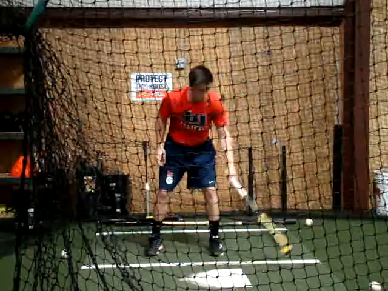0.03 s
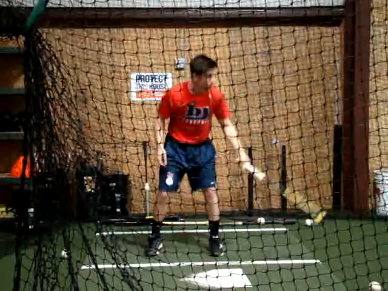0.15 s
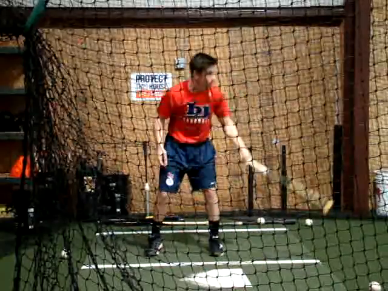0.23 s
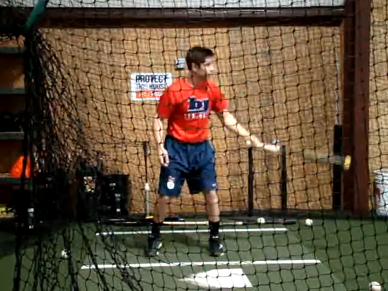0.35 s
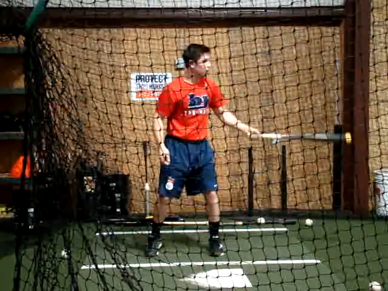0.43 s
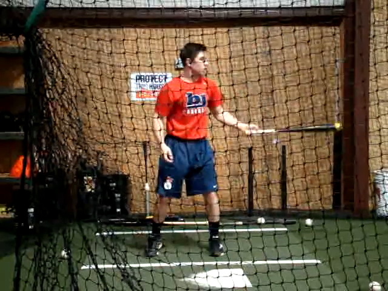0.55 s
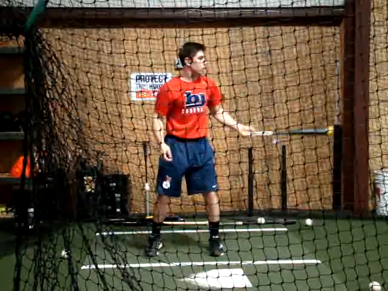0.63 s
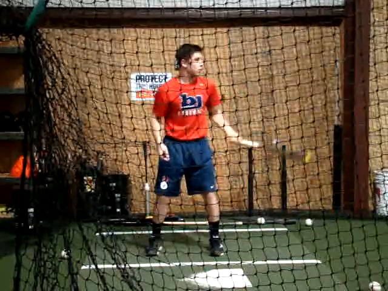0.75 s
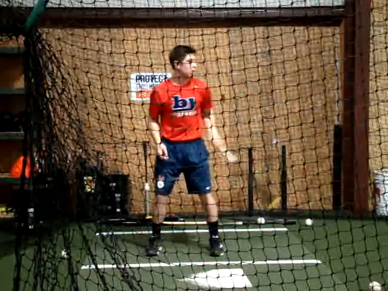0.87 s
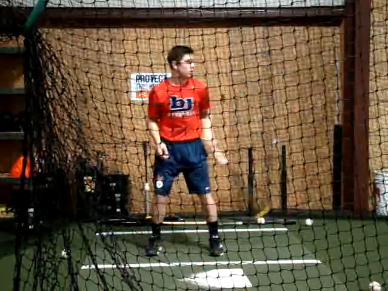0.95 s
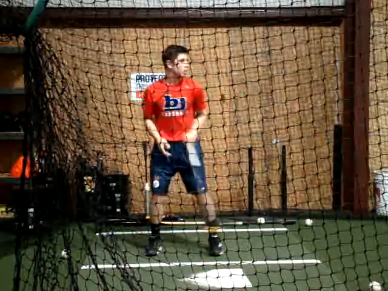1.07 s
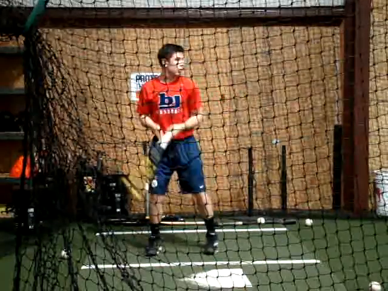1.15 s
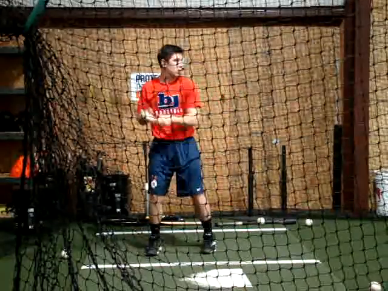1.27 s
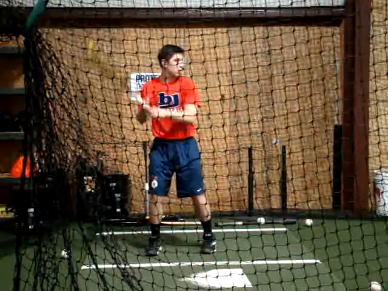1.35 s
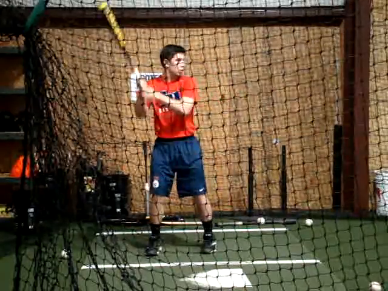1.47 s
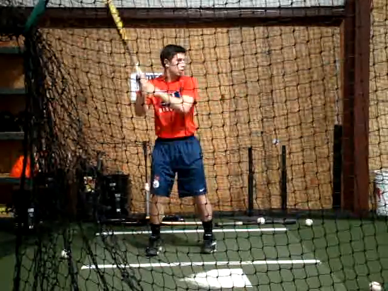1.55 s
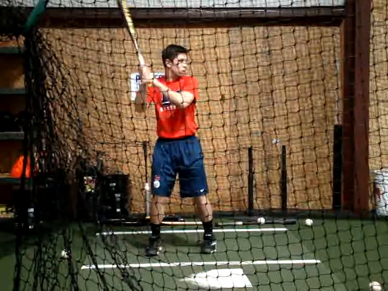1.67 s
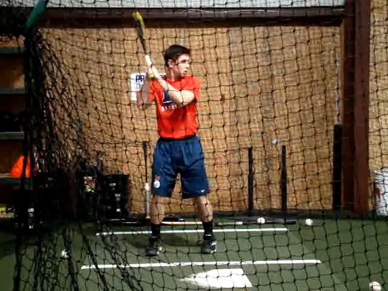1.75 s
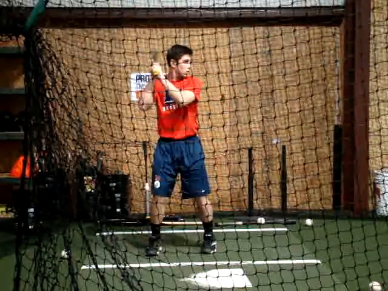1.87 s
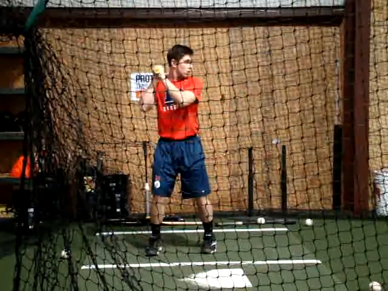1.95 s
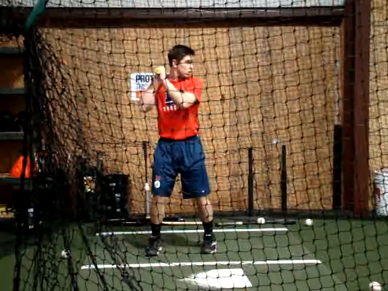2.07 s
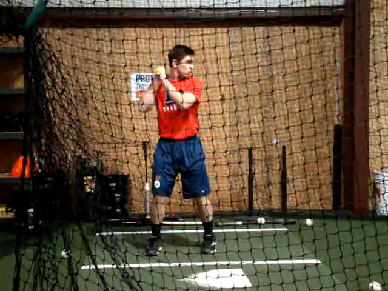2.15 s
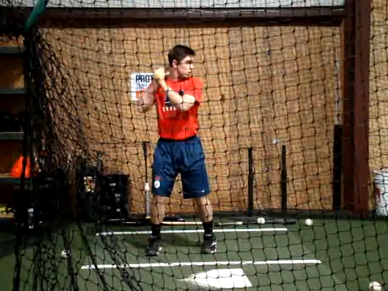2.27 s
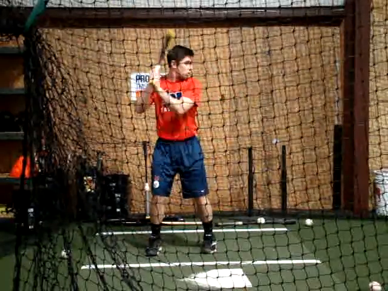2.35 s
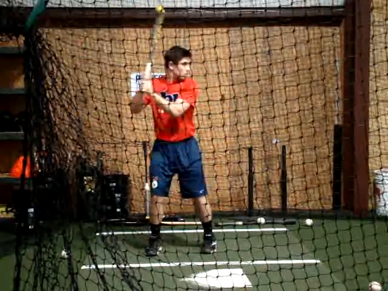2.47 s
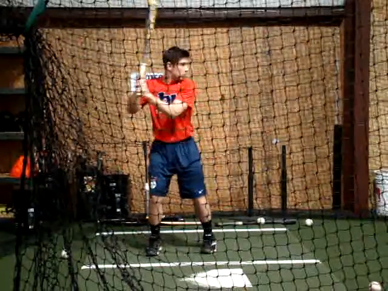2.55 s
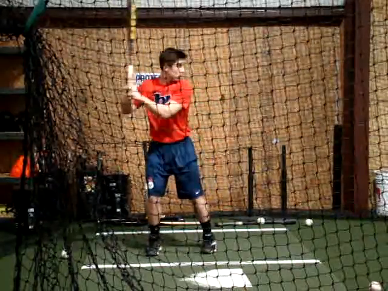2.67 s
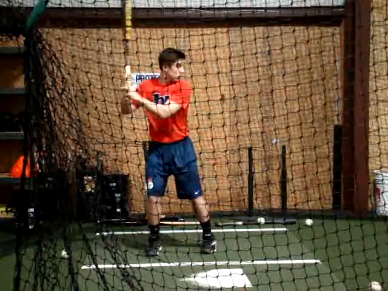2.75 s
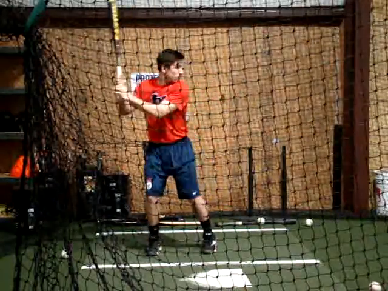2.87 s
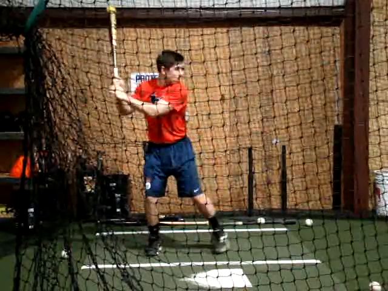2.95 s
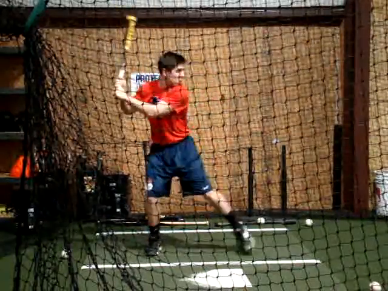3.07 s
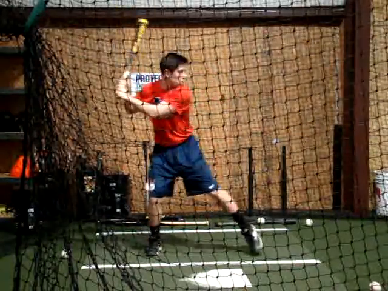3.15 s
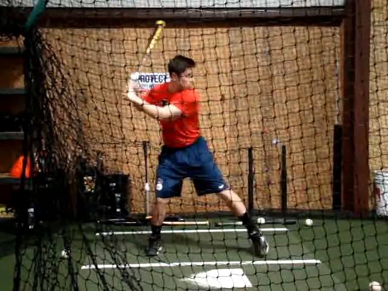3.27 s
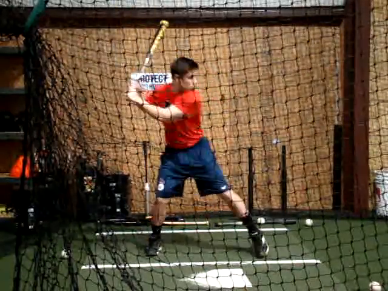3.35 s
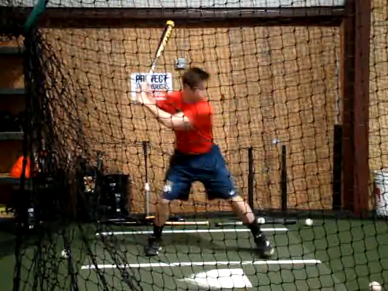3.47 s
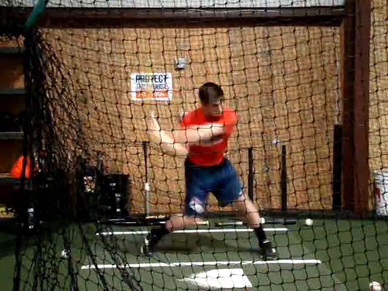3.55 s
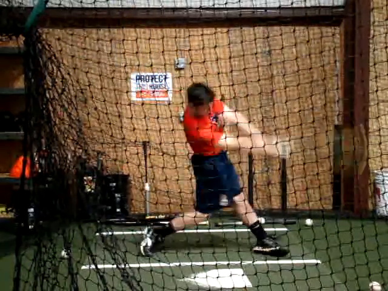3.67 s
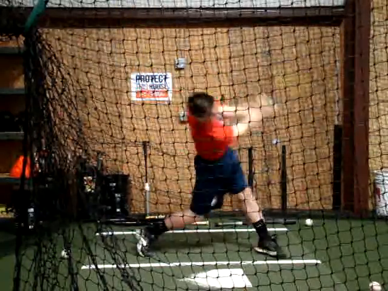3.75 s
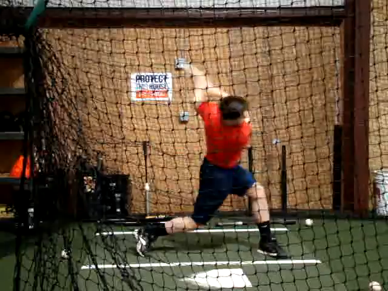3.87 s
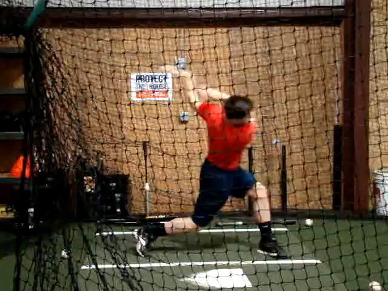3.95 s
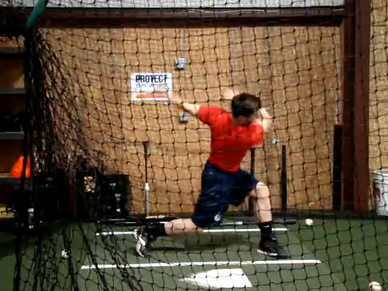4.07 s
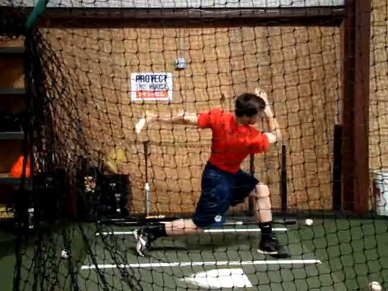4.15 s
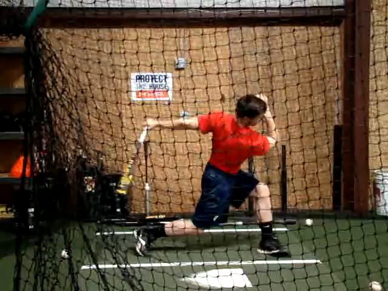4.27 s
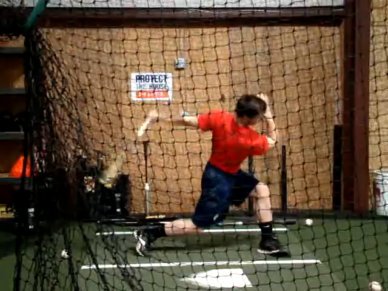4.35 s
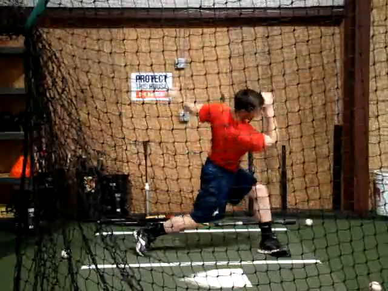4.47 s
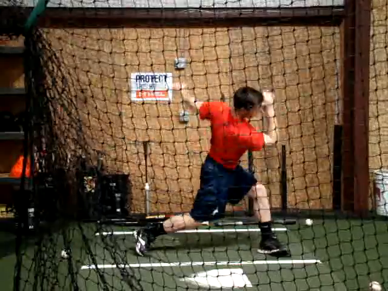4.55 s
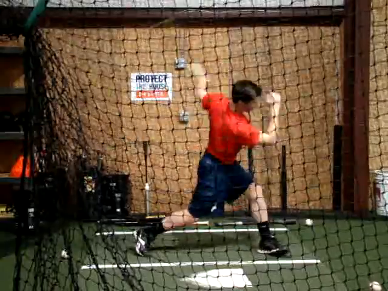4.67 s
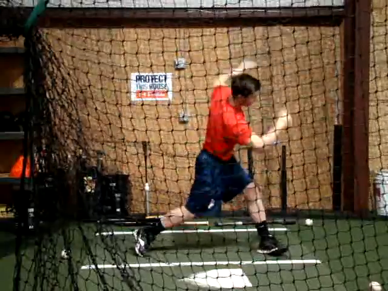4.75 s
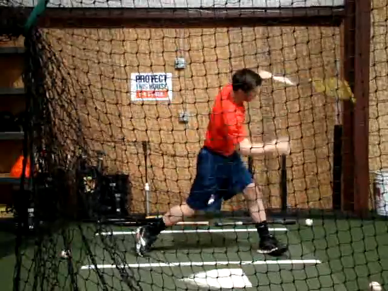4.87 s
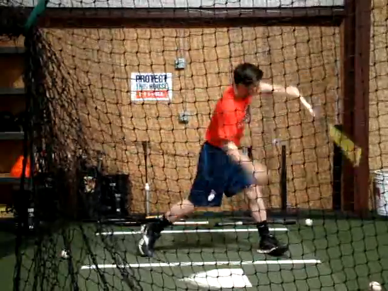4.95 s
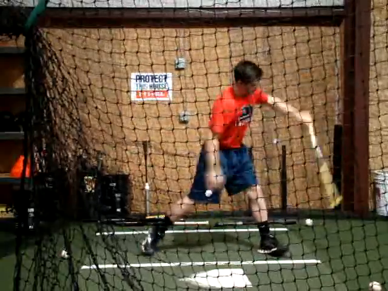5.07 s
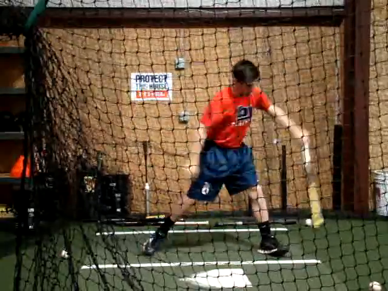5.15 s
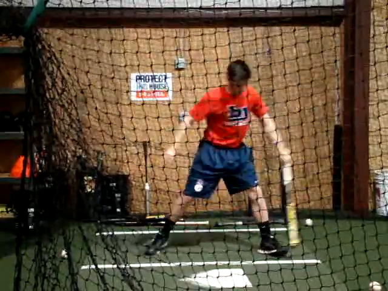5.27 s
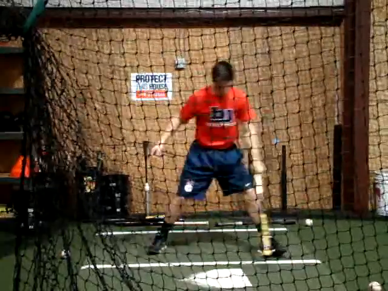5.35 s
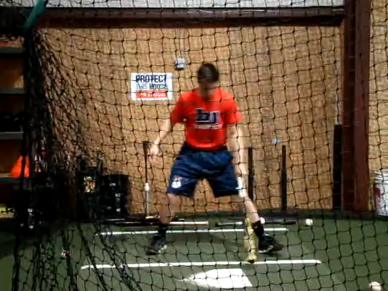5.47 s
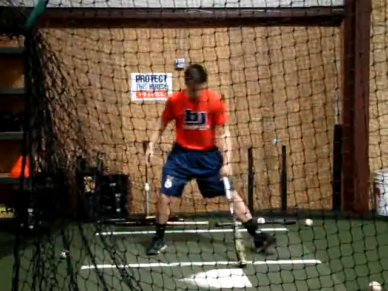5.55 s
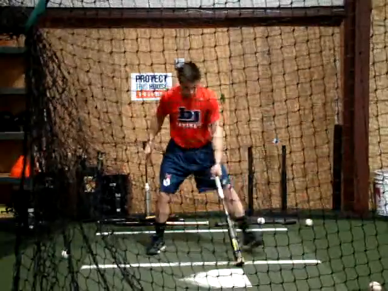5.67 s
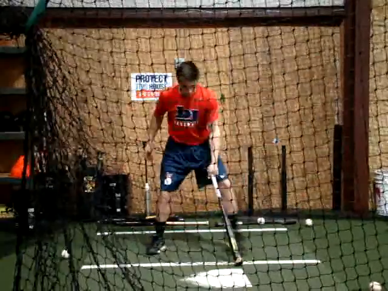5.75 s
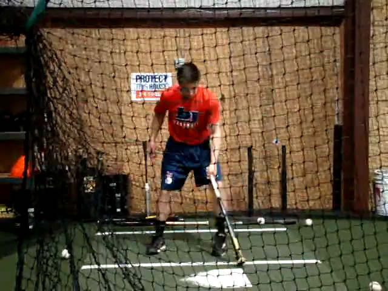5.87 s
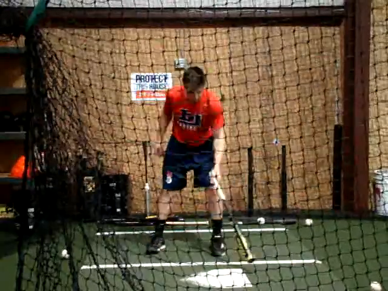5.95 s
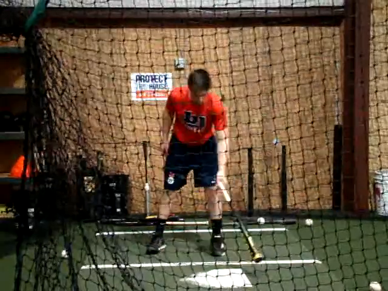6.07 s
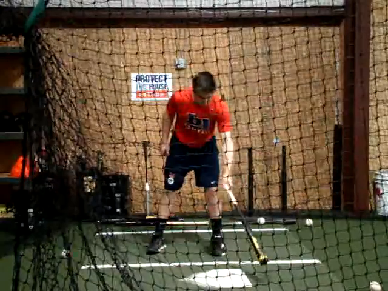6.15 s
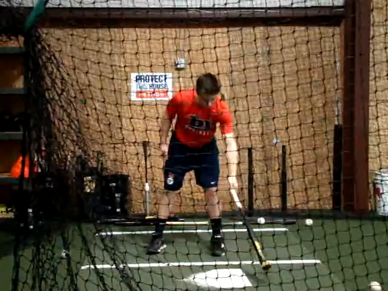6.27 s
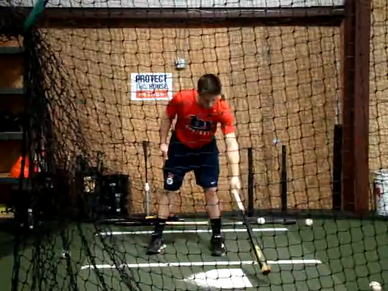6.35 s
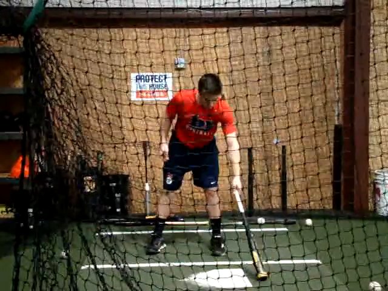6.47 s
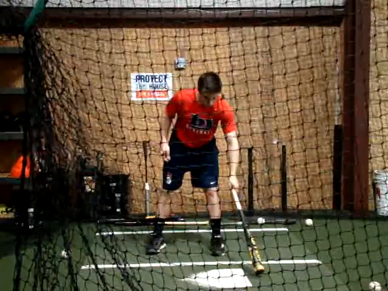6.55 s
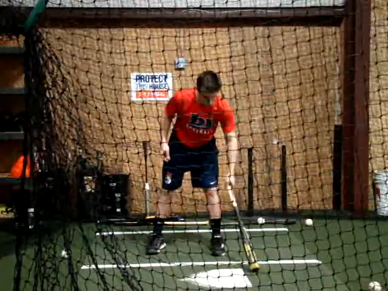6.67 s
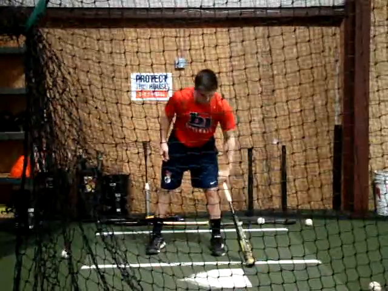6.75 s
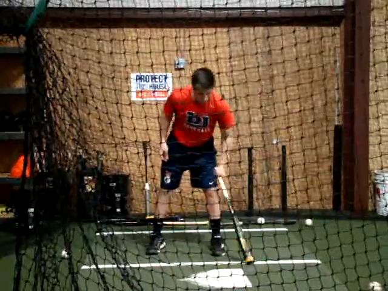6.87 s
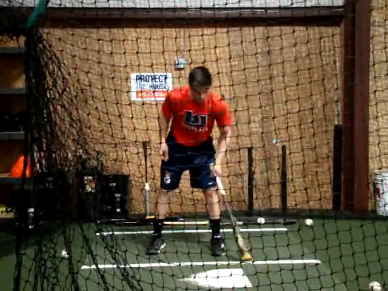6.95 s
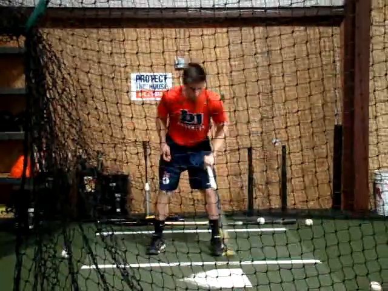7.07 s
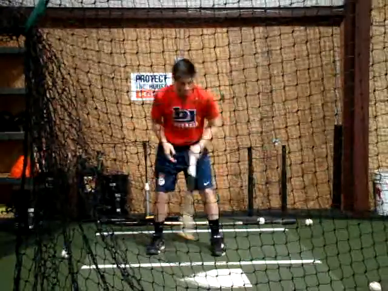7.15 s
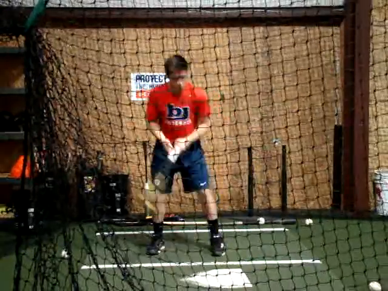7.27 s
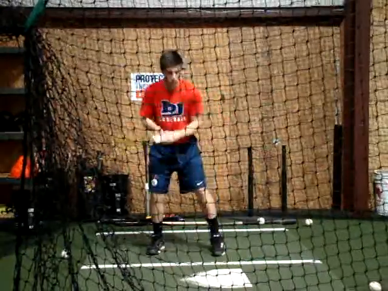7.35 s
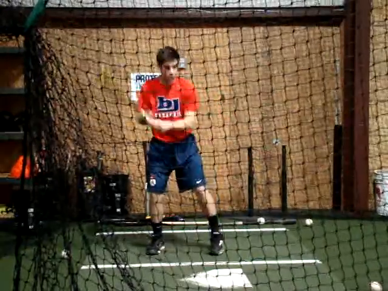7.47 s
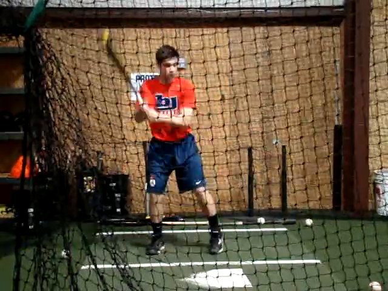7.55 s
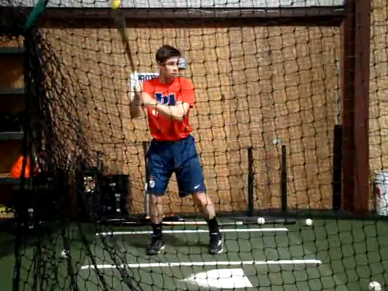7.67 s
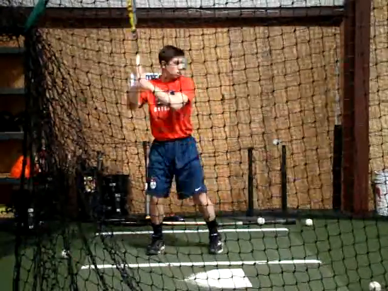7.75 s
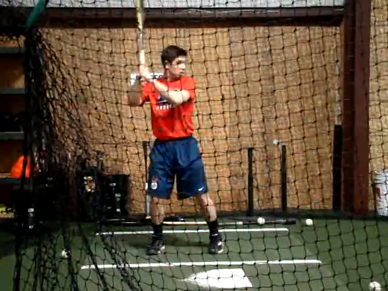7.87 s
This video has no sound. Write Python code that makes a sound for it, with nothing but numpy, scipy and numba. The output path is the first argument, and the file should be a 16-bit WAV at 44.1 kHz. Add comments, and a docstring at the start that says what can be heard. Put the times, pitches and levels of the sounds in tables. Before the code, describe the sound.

A metal bat strikes a baseball once, a sharp crack with a bright ring that dies away within a second in an indoor batting cage. A short foot skid and a rush of air lead into the hit. Afterwards come faint shoe scuffs on turf and a soft knock of the bat's tip. Underneath are a low wavering machine hum, light lamp buzz and vent hiss, which the microphone briefly turns down after the impact.

```python
"""In a netted indoor batting cage, a metal bat hits a baseball with a sharp crack.
The bat rings while it is still swinging, so each wall gets a different pitch (the Doppler effect)
and the hall holds a band of tones around 3 kHz. Air rushes round the bat; there are short shoe scuffs
and longer stretches of faint rustle. Vents hiss, lamps buzz and a far machine slowly runs down.
The camera's automatic gain drops at the hit and creeps back."""
import sys
import numpy as np
from scipy import signal
from scipy.fft import rfft, irfft, next_fast_len
from scipy.io import wavfile
from scipy.ndimage import uniform_filter1d, map_coordinates
from numba import njit

SR = 44100
rng = np.random.default_rng(int(sys.argv[2]) if len(sys.argv) > 2 else 0)


def unload_wav(signal):
    """Save mono or channel-first audio to the path in sys.argv[1] as 16-bit WAV at rate SR, clipped to [-1, 1]."""
    wavfile.write(
        sys.argv[1],
        SR,
        np.round(np.clip(np.atleast_2d(signal).T, -1, 1) * 32767).astype(np.int16),
    )


N = 349272
T = np.arange(N) / SR
HIT_S = 3.7332

# first echoes off floor, walls and roof: delay/s, ring/dB, snap/dB, angle from the bat's path/turns
ECHOES = [(.0049, 3, 1.5, 0.337), (0.0116, 11, -4, 0.4), (0.0194, -39, -4, 0.31), (0.0331, 15.5, -14, .22),
          (.0425, 0.5, -8, .2), (0.0544, -17, 1, .05)]


def amp(db):
    """Turn decibels into a multiplier."""
    return 10 ** (np.asarray(db) / 20)


def unit(x):
    """Scale a signal to an average power of 1."""
    return x / np.sqrt(np.mean(x ** 2) + 1e-20)


def along(points, hz):
    """Read between (frequency, value) points, with octaves evenly spaced."""
    freqs, values = np.transpose(points)
    return np.interp(np.log(hz + 1), np.log(freqs + 1), values)


def filtered(x, response):
    """Scale each frequency in x by response(frequency)."""
    size = next_fast_len(len(x) + 8192)
    return irfft(rfft(x, size) * response(np.fft.rfftfreq(size, 1 / SR)), size)[:len(x)]


def coloured(x, spectrum):
    """Give x a tone colour (a balance of low and high), at power 1."""
    return unit(filtered(x, lambda hz: amp(along(spectrum, hz))))


def resonance(hz, centre_hz, width_hz):
    """A resonance passes its centre fully and other frequencies less."""
    return 1j * hz * width_hz / (centre_hz ** 2 - hz ** 2 + 1j * hz * width_hz)


def wobble(rate):
    """A smooth random curve through `rate` points a second."""
    return map_coordinates(rng.standard_normal(400), [T * rate], mode="wrap")


def add(track, start_s, sound):
    """Mix a sound into the track at the given time."""
    part = track[max(round(start_s * SR), 0):][:len(sound)]
    part += sound[:len(part)]


def hall_tail(build_s=0.045, size=65536):
    """The hall's wash of echoes builds up, then each frequency dies at its own speed."""
    # how long the hall rings: f/Hz, time to fade 60 dB/s
    fade_times = [(100, 0.12), (400, 0.54), (800, 0.55), (1600, 0.91), (3200, 0.88), (5000, 0.88),
                  (10000, 0.59)]
    hz, t, noise = signal.stft(rng.standard_normal(size), SR, nperseg=256)
    tail = signal.istft(noise * amp(-60 * t / along(fade_times, hz)[:, None]), SR, nperseg=256)[1]
    tail *= 1 - np.exp(-np.arange(len(tail)) / SR / build_s)
    return tail / np.linalg.norm(tail)


def echoed(x, hall_db):
    """A sound with the hall's echoes behind it."""
    return x + amp(hall_db) * signal.fftconvolve(x, hall_tail())[:N]


def ventilation(level_db=-52, drift_db=0.82):
    """Air from the vents makes a nearly steady rush."""
    # colour of the rush: f/Hz, level/dB
    colour = [(25, -19), (55, -3), (85, -1.5), (150, 3), (300, -1.5), (600, -1.5), (1200, -1.5), (1800, -2),
              (2500, -8), (3400, -8), (4050, -7.5), (4800, -10.5), (10000, -17)]
    return amp(level_db + drift_db * wobble(1.73)) * coloured(rng.standard_normal(N), colour)


def lamps(pulse_hz=120, waver_rad=0.18):
    """The lamps' ballast coils buzz at multiples of the mains power's pulse."""
    # tones of the buzz: multiple of the pulse, level/dB
    tones = [(11, -66), (12, -63.5), (13, -65.5), (14, -64.5), (15, -61.5), (17, -66.5), (18, -64.5),
             (19, -62.5), (20, -67), (23, -69.5), (27, -69), (31, -71), (33, -65), (34, -66.5), (42, -71.5)]
    return sum(amp(db) * np.sin(2 * np.pi * (k * pulse_hz * T + rng.random()) + waver_rad * wobble(2.8))
               for k, db in tones)


def far_machine(start_hz=124.74, fall_hz_per_s=2.1, whine_s=5.91, whine_rise_s=0.61):
    """A machine hums lower and lower as it slows; a faint whine joins in late."""
    # swells of the lowest tone: t/s, level/dB
    hum_levels = [(0.0, -60.5), (0.96, -49.5), (1.44, -57.5), (1.84, -46.5), (2.36, -43), (2.64, -56),
                  (2.8, -48.5), (3.6, -44.5), (4.2, -63.5), (5.84, -59), (6.28, -63.5), (6.8, -52.5),
                  (7.28, -48), (7.88, -57.0)]
    # swells of the octave above it: t/s, level/dB
    octave_levels = [(0.0, -54.5), (0.72, -61), (1.12, -53.5), (1.36, -61), (1.6, -46), (1.8, -59),
                     (2.04, -43), (2.4, -49.5), (2.56, -40), (2.8, -53.5), (2.96, -45), (3.4, -53.5),
                     (4.76, -61), (5.08, -48), (5.24, -53.5), (6.0, -43), (6.16, -46.5), (6.36, -40),
                     (6.88, -41.5), (7.08, -52), (7.32, -40), (7.88, -63)]
    # two weak side tones: multiple of the pitch
    side_multiples = [1.62, 2.63]
    # low resonances of the hall: f/Hz, width/Hz, level/dB
    hall_modes = [(191.2, 1.4, -50), (316.4, 3.7, -55), (287.5, 5.7, -49.5)]
    # tones of the whine: multiple of the pitch, relative level/dB
    whine_tones = [(3.11, -4.5), (5.63, -4.5), (6.26, -3.5), (6.5, -9.5), (7.27, -9), (8.5, -7)]
    pitch = start_hz - fall_hz_per_s * T
    phase = 2 * np.pi * np.cumsum(pitch) / SR

    def tone(k, flutter_db=1, flutter_rate=5, waver_rad=0.1, waver_rate=8.9):
        return amp(flutter_db * wobble(flutter_rate)) * np.sin(k * phase + waver_rad * wobble(waver_rate))

    def hall_gain(f):
        return np.sqrt(sum(np.abs(amp(db) * resonance(f, hz, width)) ** 2 for hz, width, db in hall_modes))

    swell = lambda levels: amp(np.interp(T, *np.transpose(levels)))
    hum = swell(hum_levels) * tone(1) + swell(octave_levels) * tone(2)
    # the side tones stand out as they slide through the hall's resonances
    sides = amp(-1) * sum(hall_gain(k * pitch) * tone(k) for k in side_multiples)
    whine = sum(amp(db) * tone(k, flutter_db=3, flutter_rate=7, waver_rad=1.6, waver_rate=18)
                for k, db in whine_tones)
    fade_in = np.clip((T - whine_s) / whine_rise_s, 0, 1)
    return hum + sides + amp(-56) * fade_in * whine


def grainy_noise(colour, uneven_db=2.5):
    """Dense grains of uneven size, like turf fibres flicking against a sole."""
    sizes = amp(uneven_db * unit(uniform_filter1d(rng.standard_normal(N), 40)))
    return coloured(sizes * rng.standard_normal(N), colour)


def strokes(rows, rise):
    """Each stroke swells for the fraction `rise` of its length, then fades; share scales its power."""
    level = np.zeros(N)
    for start_s, db, length_s, share in rows:
        progress = np.arange(int(3 * length_s * SR)) / SR / length_s
        shape = np.minimum(progress / rise, 1) * np.exp(-progress ** 4 / 2)
        add(level, start_s, amp(db) * np.sqrt(share) * shape)
    return level


def scuffs_and_rustle():
    """Short shoe scuffs, plus longer stretches of faint, soft rustle, in a dull and a crisp part."""
    # short scuffs and longer rustles: t/s, level/dB, length/s, crispness (0 = dull, 1 = crisp)
    sounds = [(0.142, -49, .025, 0.96), (1.1, -55.5, .24, 0.68), (1.273, -51, .069, 0.034),
              (2.934, -56, 0.076, 0.4), (3.564, -38, 0.046, 0), (4.55, -52.5, 0.19, 1),
              (4.969, -52.5, 0.12, 0.9), (5.277, -51, 0.44, 0.54), (5.647, -52, 0.074, 0.43),
              (5.703, -49, 0.05, .15), (5.876, -47.5, 0.1, 0.076), (6.075, -52.5, 0.21, 0),
              (6.501, -47, 0.053, 0.87), (6.716, -45, 0.053, 0.91), (6.838, -45.5, 0.045, 0.92),
              (6.893, -50, 0.061, 0.27), (7.605, -53.5, 0.25, 0)]
    # dull colour, as of turf: f/Hz, level/dB
    dull_colour = [(100, -17), (300, 0.5), (900, 5.5), (2000, 2), (3000, -2), (6000, -12), (10000, -14.5)]
    # crisp colour, as of a sole: f/Hz, level/dB
    crisp_colour = [(100, -9), (400, -4.5), (900, -0.5), (1500, -4.5), (3000, -4), (5500, -5.5),
                    (10000, -12.5)]
    dull_sounds = [(start_s, db, length_s, 1 - crispness) for start_s, db, length_s, crispness in sounds]
    dull = strokes(dull_sounds, rise=0.23) * grainy_noise(dull_colour)
    crisp = strokes(sounds, rise=0.073) * grainy_noise(crisp_colour)
    return dull, crisp


def skid(start_s=3.546, rise_s=0.017, stop_s=0.008, level_db=-37.5, judder_db=0.7):
    """The front foot lands and slides, shaking a little, until the ball is struck."""
    # colour of the slide: f/Hz, level/dB
    colour = [(60, -34), (200, -19), (400, 4), (800, -6.5), (1600, 4), (3000, -1), (5000, -5), (10000, -10)]
    landing = np.clip((T - start_s) / rise_s, 0, 1) ** 2
    stopping = np.exp(-np.maximum(T - HIT_S, 0) / stop_s)
    return amp(level_db + judder_db * wobble(35)) * landing * stopping * grainy_noise(colour)


def set_down(start_s=5.7, length_s=0.05, level_db=-47):
    """The bat's tip meets the turf with a soft knock."""
    # resonances of the knock: f/Hz, width/Hz, relative level/dB
    modes = [(1043, 120, -3), (1690, 200, -6), (1970, 120, 2)]
    body = lambda f: sum(amp(db) * resonance(f, hz, width) for hz, width, db in modes)
    knock = unit(filtered(rng.standard_normal(N), body))
    return strokes([(start_s, level_db, length_s, 1)], rise=0.15) * knock


def taps(size=8192):
    """Bat and grip tick lightly: each touch is a noise burst sent twice through one resonance."""
    # touches: t/s, level/dB, f/Hz, resonance width/Hz, time to fade 60 dB/s
    touches = [(0.1352, -43.5, 517, 260, 0.17), (0.135, -38, 1700, 2980, 0.0093),
               (0.139, -41.5, 4300, 6000, .035), (1.7065, -42.5, 3180, 1100, 0.034),
               (1.866, -43, 3900, 1200, .035), (3.468, -42, 4000, 1190, 0.012),
               (6.2792, -44, 4700, 2040, 0.019), (7.205, -45.5, 4050, 900, 0.033)]
    out, t = np.zeros(N), np.arange(size) / SR
    for start_s, db, hz, width, fade_s in touches:
        burst = filtered(rng.standard_normal(size), lambda f: resonance(f, hz, width) ** 2)
        add(out, start_s, amp(db - 60 * t / fade_s) * unit(burst))
    return out


def swing(whoosh_db=-43, swish_db=-29, rise_s=0.1, fall_s=0.004):
    """Air rushes round the bat: a low whoosh turns into a swish at full speed."""
    # colour of slow air: f/Hz, level/dB
    whoosh_colour = [(40, -41), (90, -21), (170, 5), (330, 0.5), (500, -7), (2000, -24), (10000, -63)]
    # colour of fast air: f/Hz, level/dB
    swish_colour = [(40, -44), (150, 0), (330, -11), (500, -6), (1000, -3), (2000, -15), (5000, -14),
                    (10000, -24)]
    rush = np.exp(-np.maximum((HIT_S - T) / rise_s, (T - HIT_S) / fall_s))
    whoosh = amp(whoosh_db) * rush * coloured(rng.standard_normal(N), whoosh_colour)
    swish = amp(swish_db) * rush ** 6 * coloured(rng.standard_normal(N), swish_colour)
    return whoosh + swish


def small_sounds():
    """Footwork, faint rustle, taps and the swing; dull sounds get more echo than crisp ones."""
    dull, crisp = scuffs_and_rustle()
    dull = echoed(dull + skid() + set_down(), hall_db=-5.5)
    crisp = echoed(crisp + amp(-1) * taps(), hall_db=-8.5)
    return dull + crisp + swing()


def crack(push_db=2, push_s=0.0005, snap_db=-8, snap_fade_s=0.018, echo_db=-4, hall_db=-15, size=2048):
    """The ball flattens on the bat: one push of air and a sharp snap, which the hall repeats."""
    # colour of the snap: f/Hz, level/dB
    colour = [(60, -26), (250, -31), (500, -10), (1000, 4), (1600, 8.5), (2200, 4.5), (3100, 7.5),
              (4200, 1.5), (6000, -3), (10000, -8)]
    out, t = np.zeros(N), np.arange(size) / SR
    push = (t / push_s - 1) * np.exp(-t / push_s)
    add(out, HIT_S, amp(push_db) * push)
    snap = lambda: coloured(rng.standard_normal(size), colour) * amp(-60 * t / snap_fade_s)
    add(out, HIT_S, amp(snap_db) * snap())
    for delay, _, db, _ in ECHOES:
        add(out, HIT_S + delay, amp(echo_db + db) * snap())
    add(out, HIT_S, amp(hall_db) * coloured(hall_tail(), colour))
    return out


def barrel(angle_turns, speed_m_per_s=21.5, slowing_s=0.43, size=16384):
    """The bat's thick end rings as it moves: higher heard from ahead, lower from behind."""
    # tones of the metal: f/Hz, relative level/dB, time to fade 60 dB/s
    tones = [(1260, -48, 0.054), (1625, -19, 0.074), (2814, -17.5, 0.16), (3195, -3.5, 0.12),
             (3980, -31, 0.25), (6900, -34, 0.1)]
    t = np.arange(size) / SR
    travel_m = speed_m_per_s * slowing_s * (1 - np.exp(-t / slowing_s))
    shifted_t = t + np.cos(2 * np.pi * angle_turns) * travel_m / 343  # sound travels 343 m/s
    return sum(amp(db - 60 * t / fade_s) * np.sin(2 * np.pi * hz * shifted_t) for hz, db, fade_s in tones)


def bat_ring(direct_db=-9, early_db=-5, hall_db=19, directions=16):
    """The ring arrives straight, off the nearest surfaces, and from all round the hall."""
    out = np.zeros(N)
    add(out, HIT_S, amp(direct_db) * barrel(1 / 4))  # side-on, so no pitch shift
    for delay, db, _, angle in ECHOES:
        add(out, HIT_S + delay, amp(early_db + db) * barrel(angle))
    for angle in (np.arange(directions) + 0.5) / directions / 2:
        wash = signal.fftconvolve(barrel(angle), hall_tail())
        add(out, HIT_S, amp(hall_db) / np.sqrt(directions) * wash)
    return out


def scene():
    """Everything that reaches the microphone, as one channel."""
    return (bat_ring() + crack() + small_sounds() + far_machine() + lamps() + ventilation())[None]


@njit
def follow(need, attack, release):
    """Rise fast towards the needed cut in volume, and sink back slowly."""
    out, held = np.empty(len(need)), 0.0
    for i in range(len(need)):
        held += (need[i] - held) * (attack if need[i] > held else release)
        out[i] = held
    return out


def ducked(x, limit_db, attack_s, release_s):
    """Automatic gain turns the sound down when its peaks pass the limit."""
    need_db = np.maximum(20 * np.log10(np.abs(x) + 1e-9) - limit_db, 0)
    return x * amp(-follow(need_db, 1 / (attack_s * SR), 1 / (release_s * SR)))


def record(dry, hiss_db=-62, low_cut_hz=85, top_hz=10030):
    """The camera thins the bass, turns loud moments down, adds hiss and cuts the highest treble."""
    x = signal.sosfilt(signal.butter(1, low_cut_hz, "high", fs=SR, output="sos"), dry[0])
    x = ducked(x, limit_db=-8.5, attack_s=0.0045, release_s=0.72)  # creeps back after the hit
    x = ducked(x, limit_db=-9.0, attack_s=0.0003, release_s=0.0084)  # catches quick peaks
    x = x / (1 + np.abs(x / 0.75) ** 4) ** (1 / 4)  # rounds off the peaks
    x = x + amp(hiss_db) * rng.standard_normal(N)
    return filtered(x, lambda hz: 1 / np.sqrt(1 + (hz / top_hz) ** 500))[None]


dry = scene()
out = record(dry)
unload_wav(out)
```